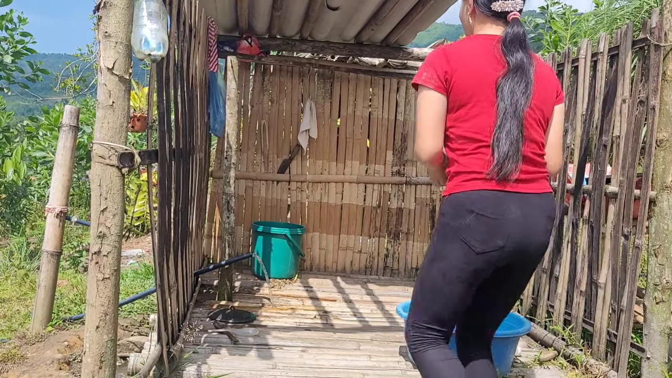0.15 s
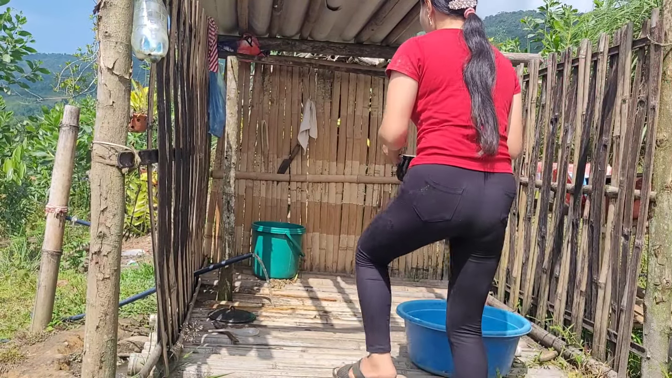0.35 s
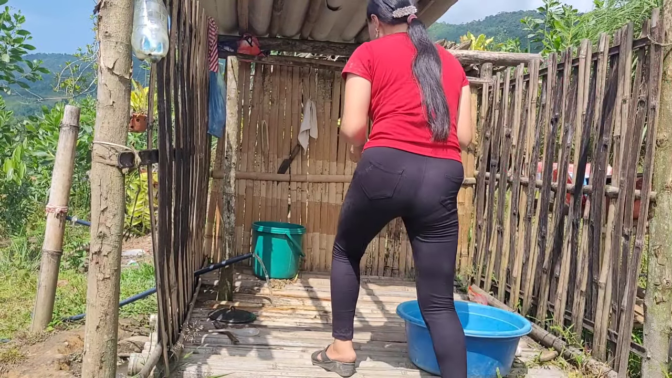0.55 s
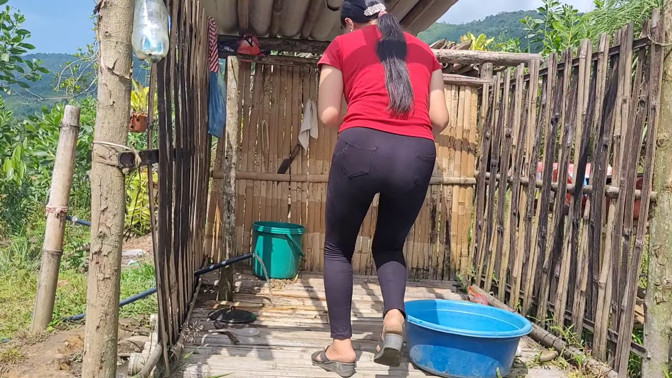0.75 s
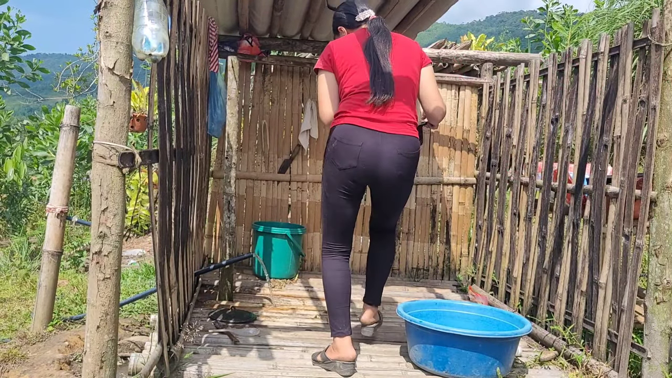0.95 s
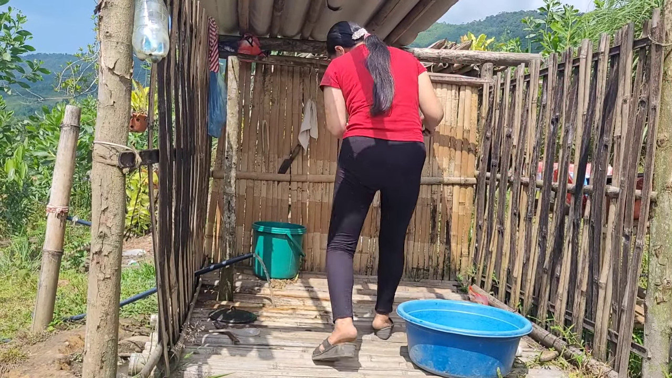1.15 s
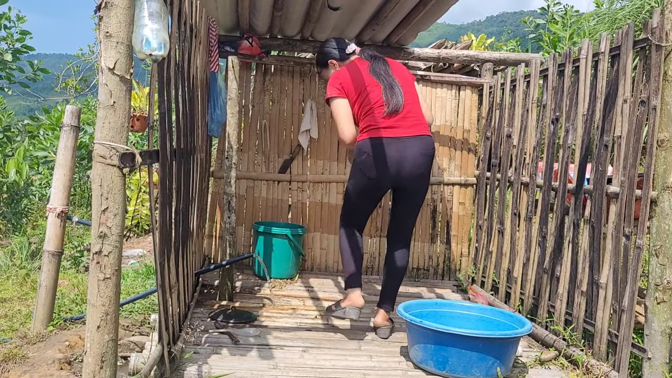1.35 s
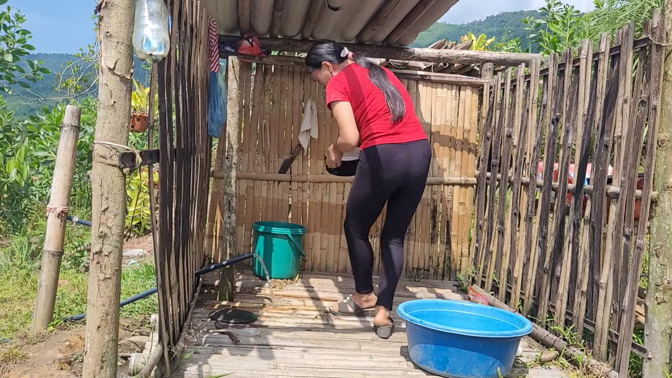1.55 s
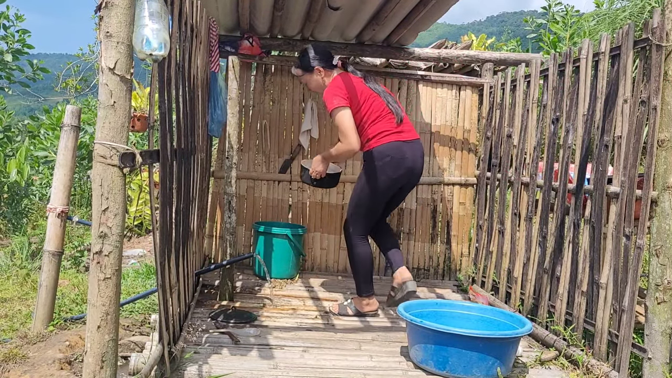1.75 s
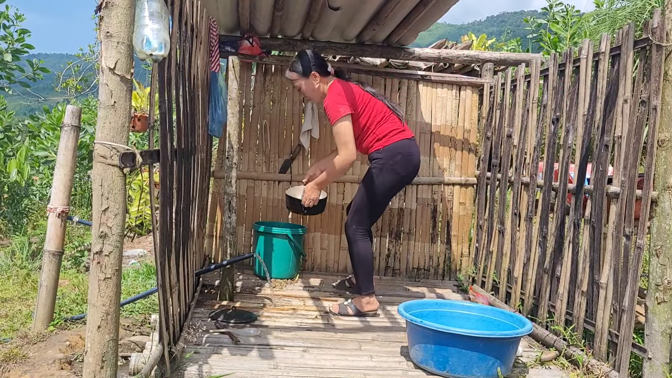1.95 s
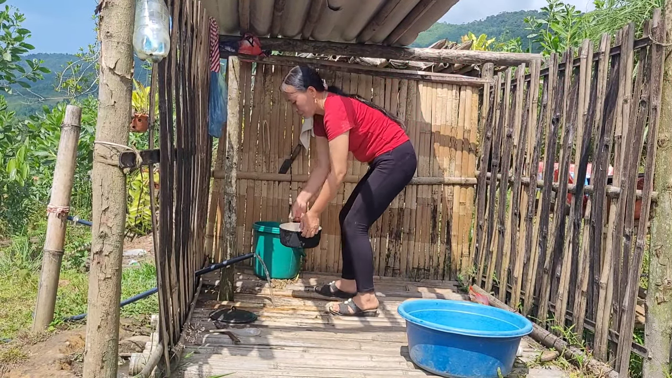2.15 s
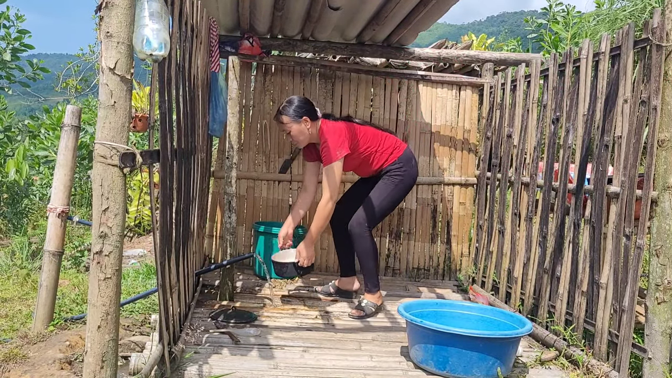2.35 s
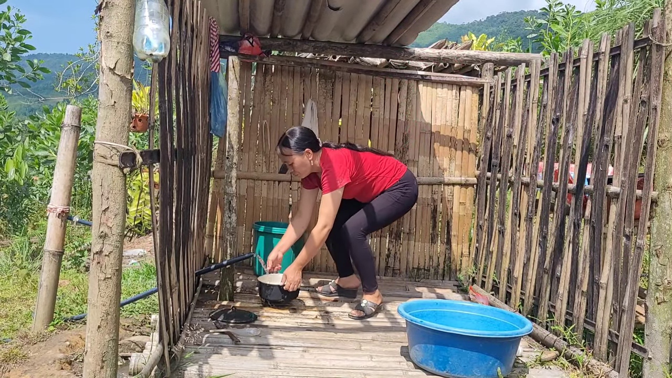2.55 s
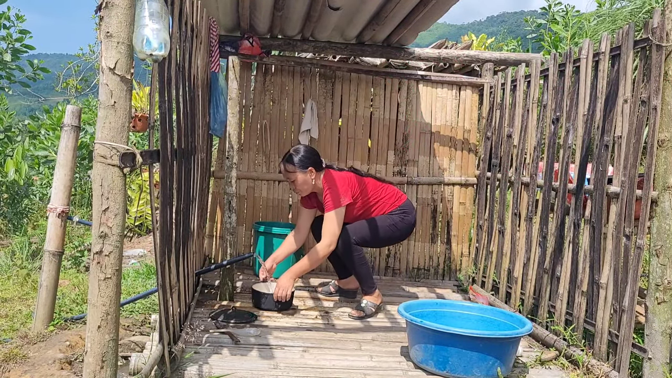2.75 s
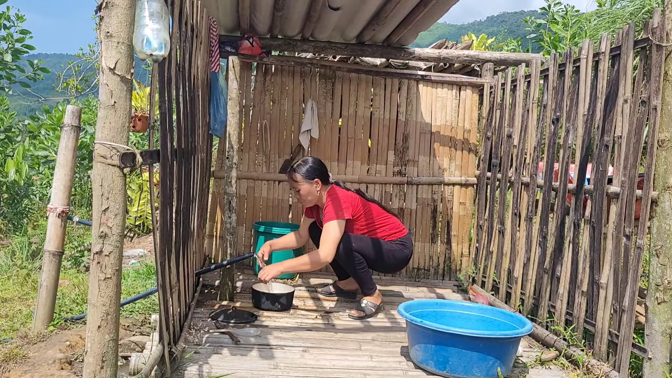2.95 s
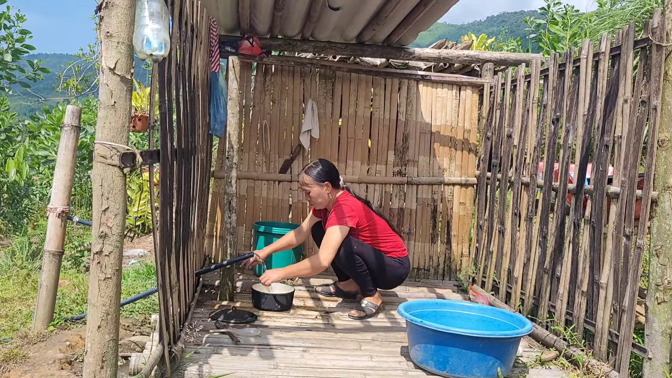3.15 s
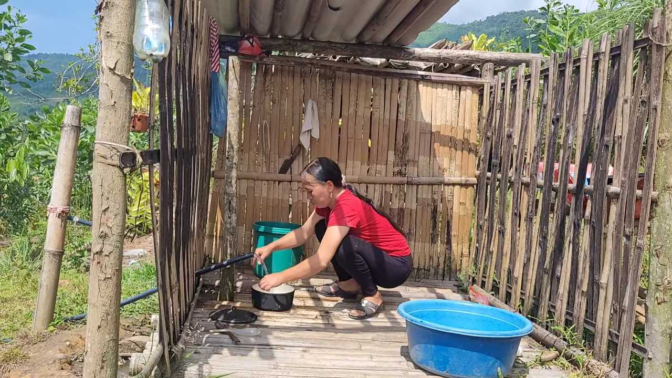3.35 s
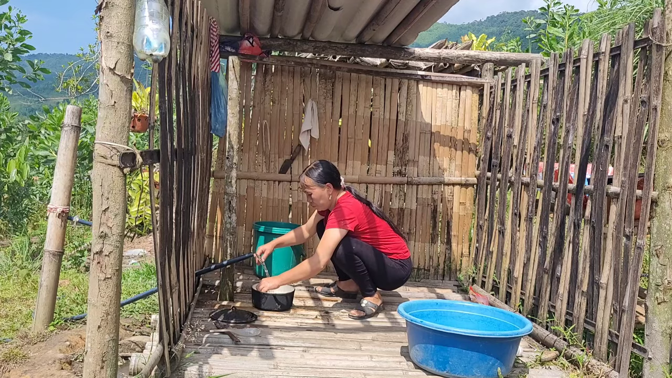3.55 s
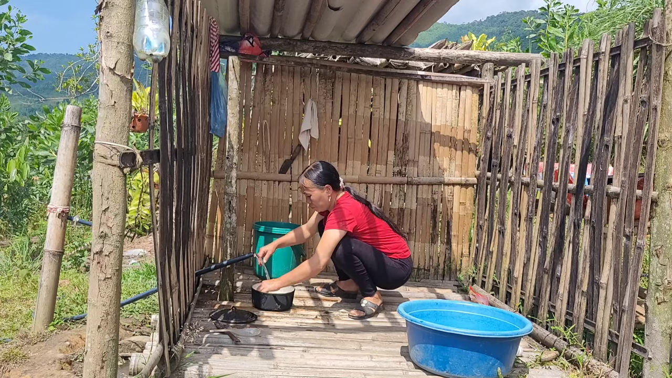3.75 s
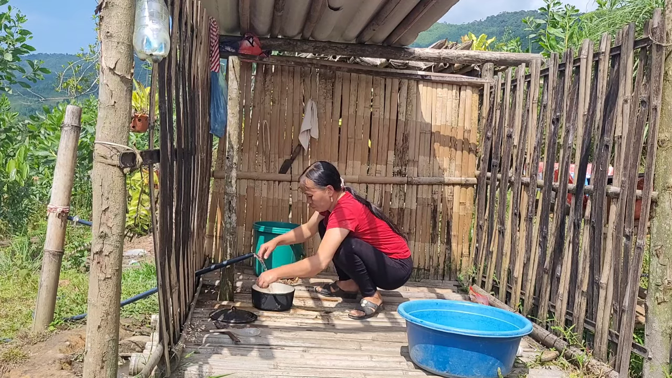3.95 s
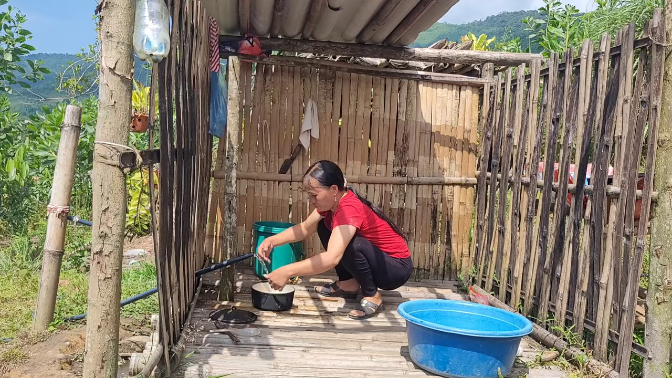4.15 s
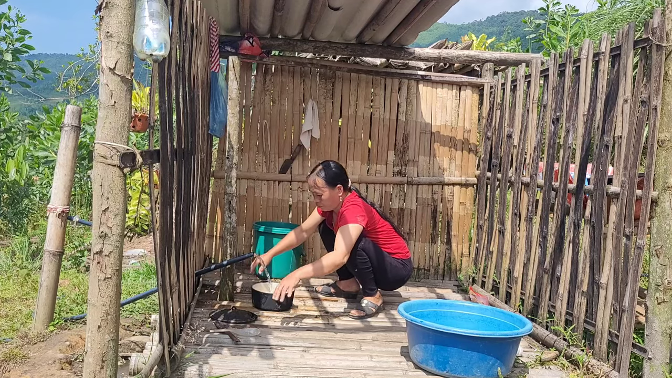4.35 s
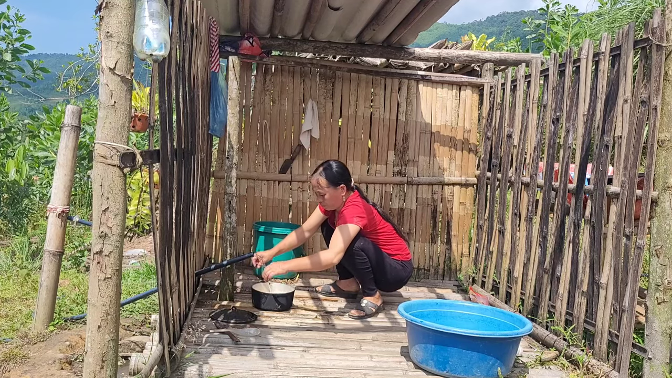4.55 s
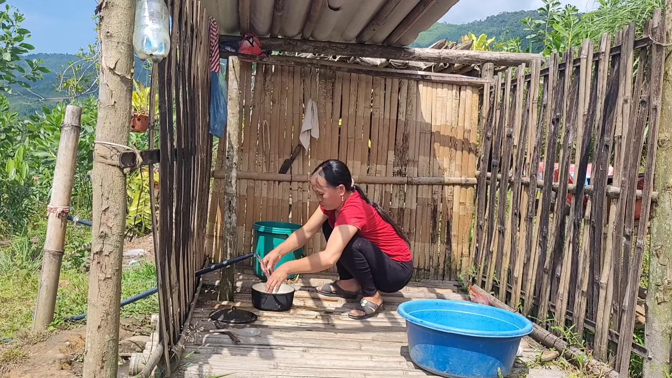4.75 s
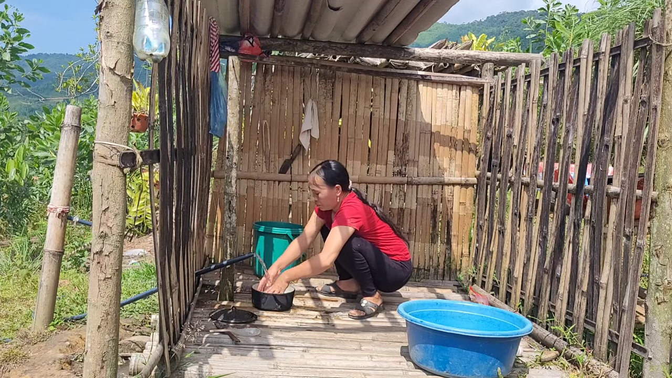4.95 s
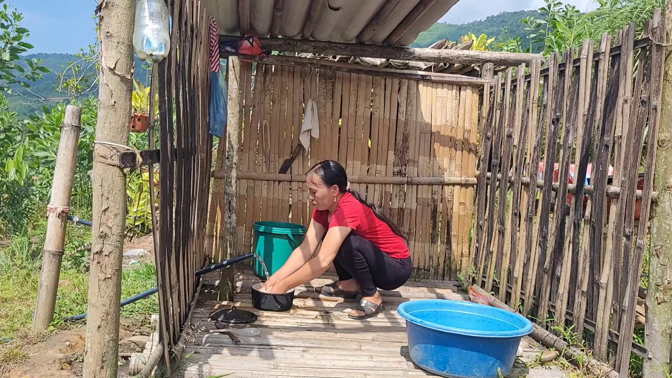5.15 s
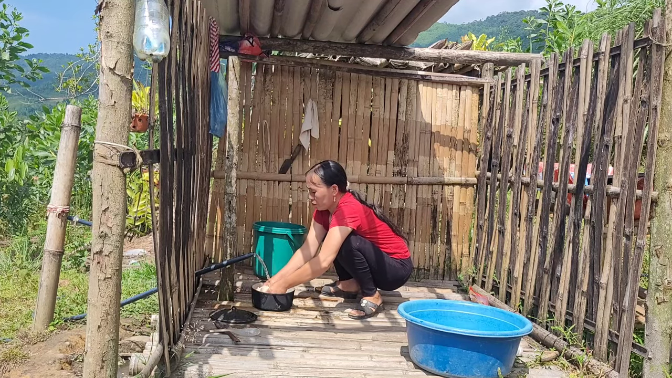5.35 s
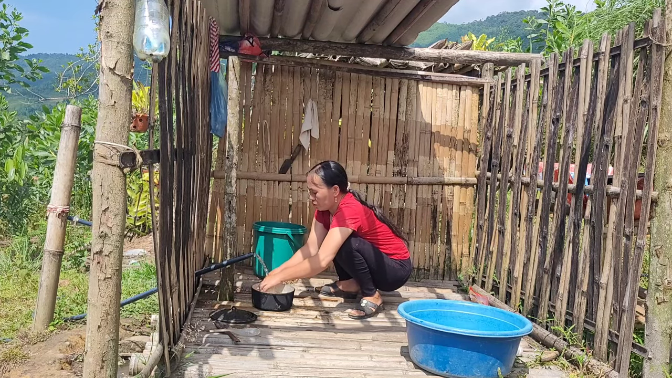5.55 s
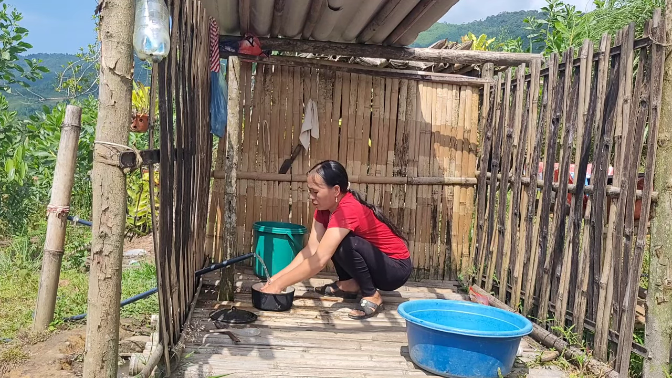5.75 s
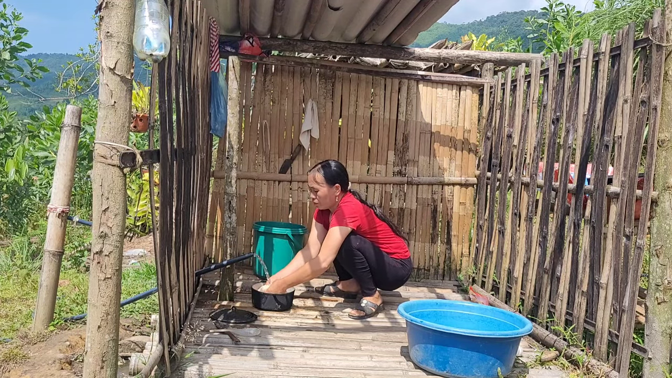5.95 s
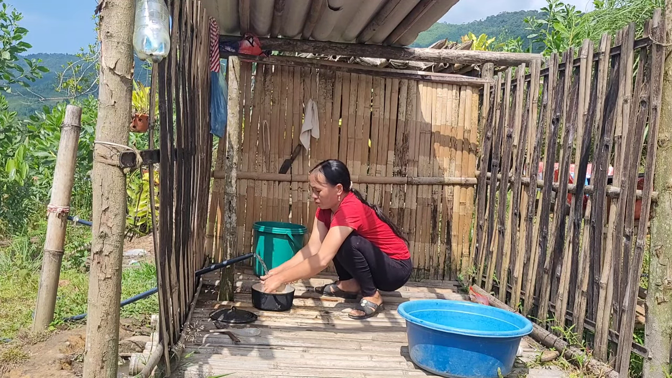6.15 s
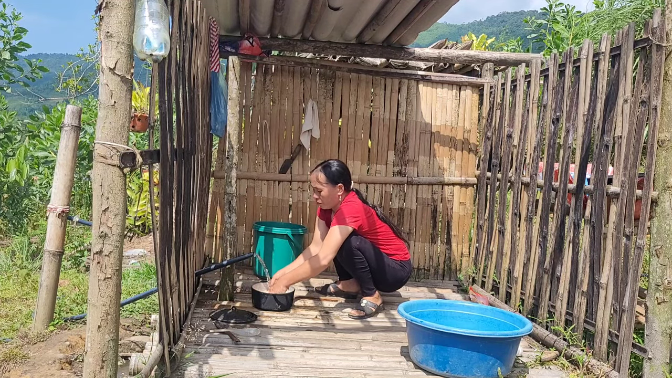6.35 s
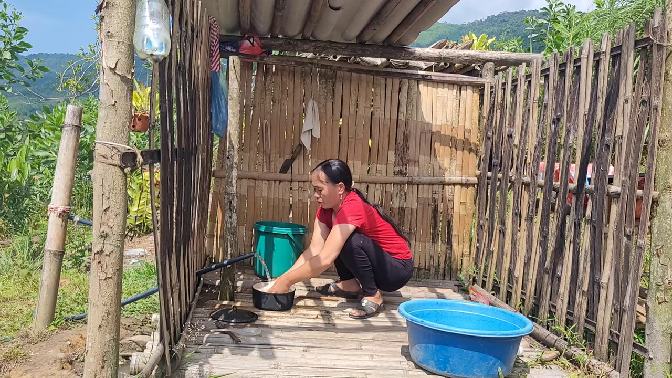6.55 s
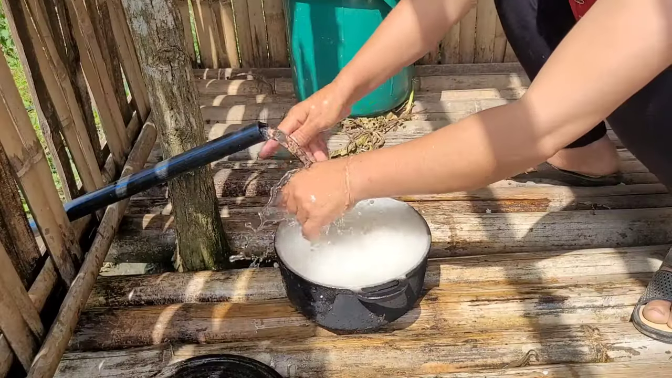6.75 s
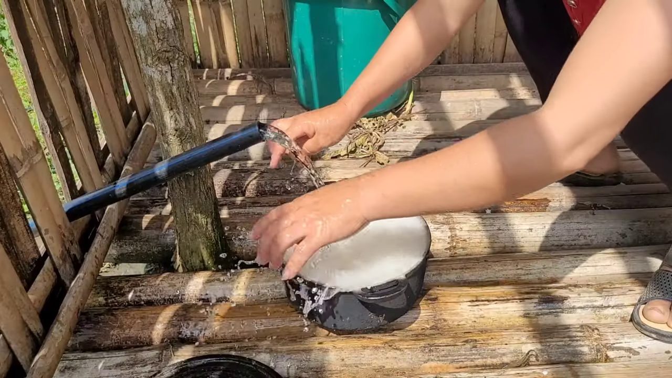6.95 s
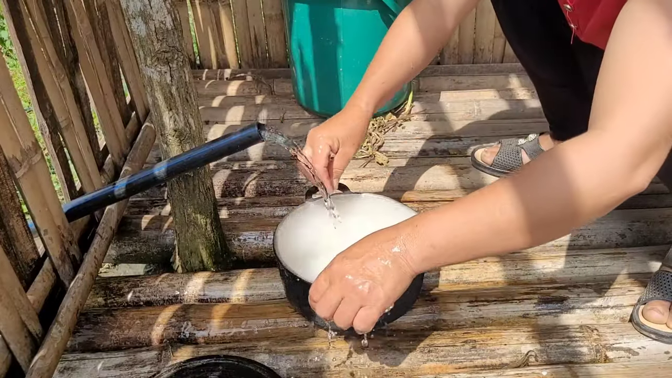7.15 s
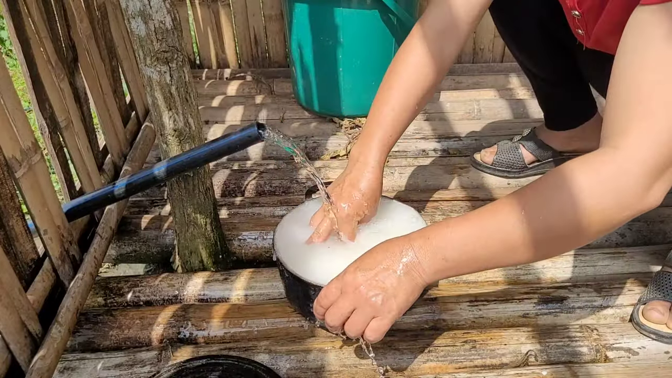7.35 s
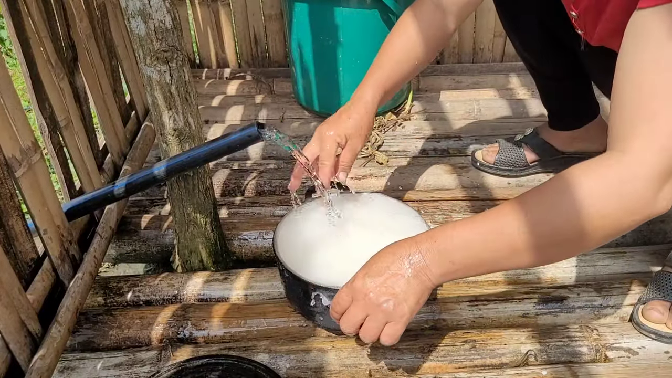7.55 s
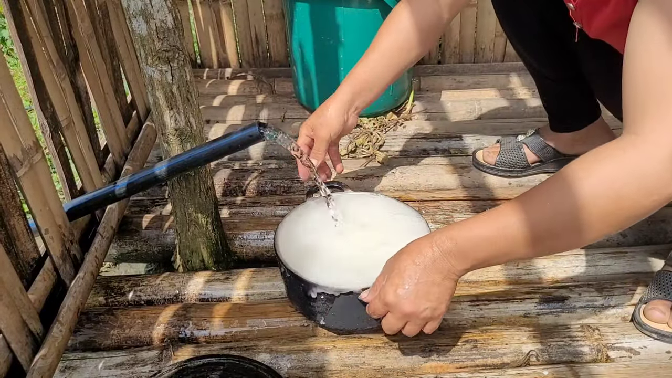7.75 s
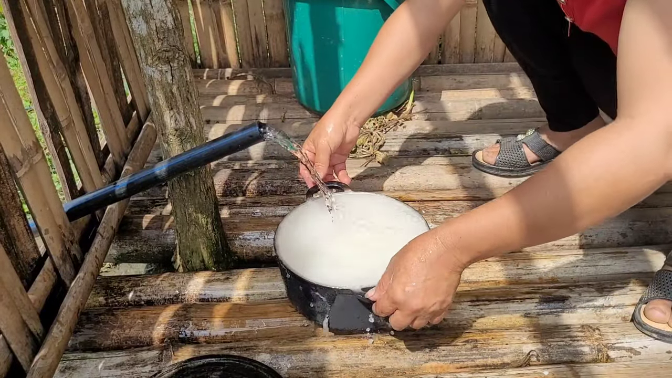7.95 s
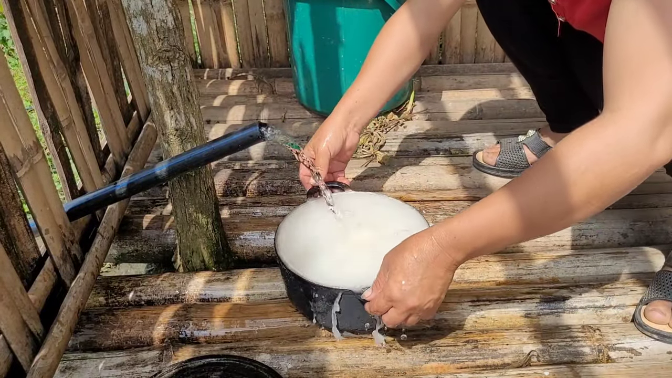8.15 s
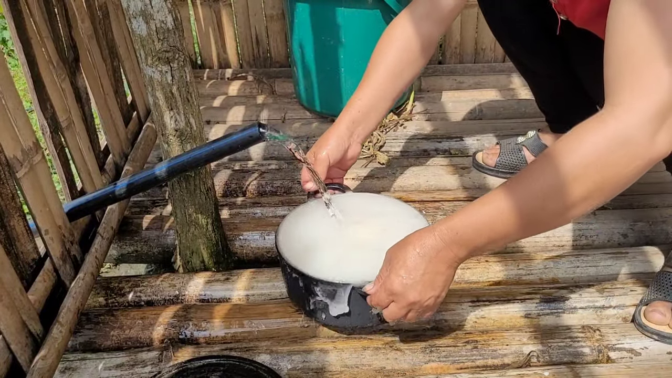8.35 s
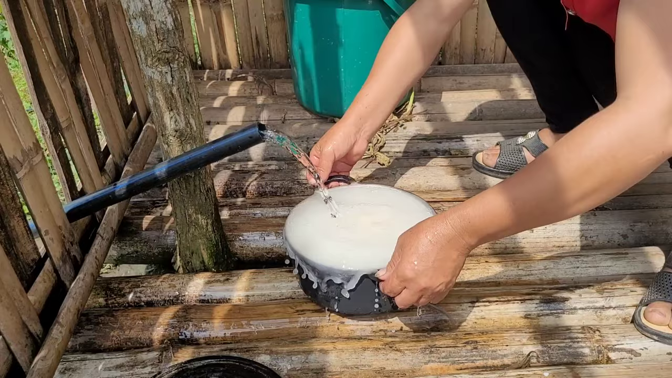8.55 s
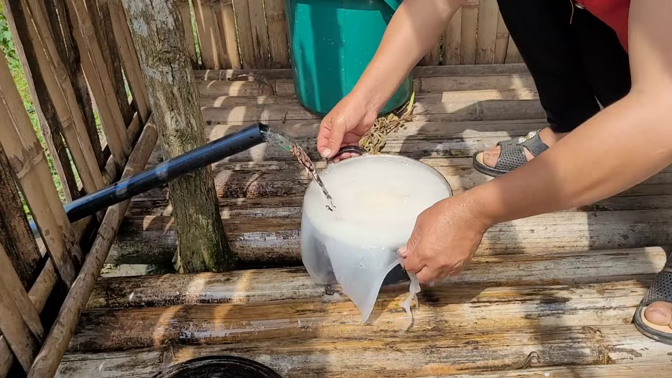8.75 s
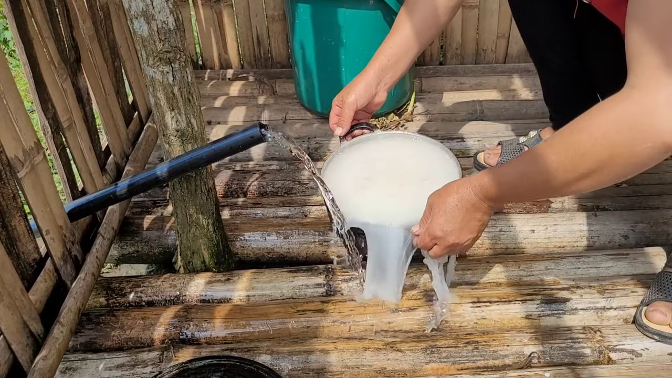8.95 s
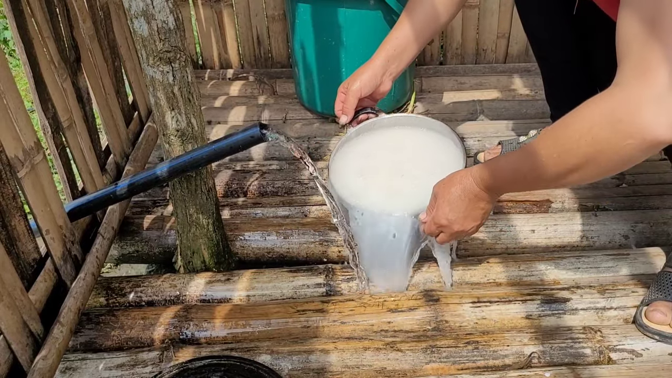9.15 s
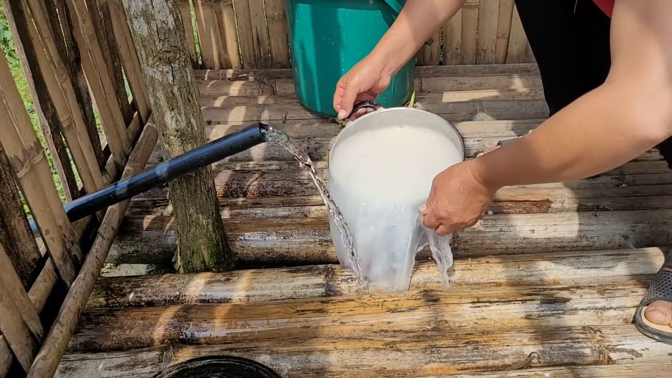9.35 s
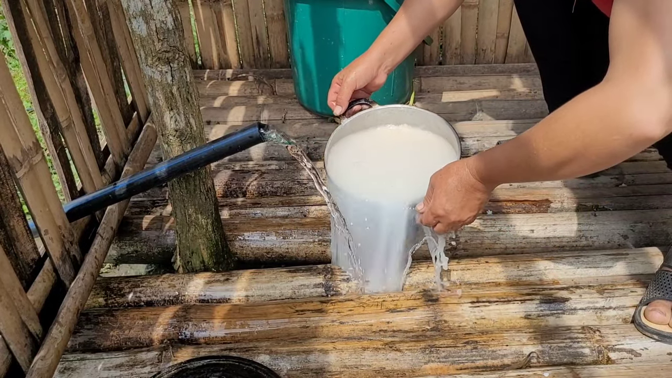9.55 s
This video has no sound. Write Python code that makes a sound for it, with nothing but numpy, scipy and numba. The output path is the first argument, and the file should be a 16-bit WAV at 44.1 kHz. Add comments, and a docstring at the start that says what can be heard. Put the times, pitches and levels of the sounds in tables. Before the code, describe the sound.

In an open bamboo stall, a thin hose stream patters steadily on bare slats, heard from the doorway over faint airy hiss. Hollow sandal steps knock at about 0.5, 1.2, 1.6, 2.0 and 2.4 seconds, the first fairly sharp. Low wind thumps the microphone, strongest from 1.6 to 4. At 2.75 the pot lands with a loud, woody clattering knock, and the patter dies by 3. Water now trickles softly into the pot, with a faint sliding whistle near 3.5 and small plops around 4. From 5 to 6.7 stirring swishes and bubbles in two rounds. At 6.75 the sound jumps close and louder, with little wind: water splashes over hands, bright slaps and quick plops until 7.7. The brimming pot then gurgles and drips with crisp plinks and light taps. From 9 a spill swells into a dense, drumming rush on the slats, cut off near 9.6.

```python
"""Water from a hose patters on a bamboo floor; someone walks in, sets down a pot of rice and rinses it.
The stream is a cloud of droplet clicks and ringing bubbles, heard first from the doorway, then from close by,
where hands splash and the tilted pot spills onto the hollow slats. Knocks excite the damped modes of the slats.
Low-frequency noise is the breeze buffeting the microphone ports, over a faint hiss of distant air."""
import sys
import numpy as np
from scipy import signal
from scipy.fft import rfft, irfft
from scipy.io import wavfile
from scipy.ndimage import uniform_filter1d, map_coordinates
from numba import njit

SR = 44100
rng = np.random.default_rng(int(sys.argv[2]) if len(sys.argv) > 2 else 0)


def master_out(mix):
    """Clip the mix to full scale and print it as 16-bit PCM to the path in sys.argv[1]."""
    frames = np.transpose(np.atleast_2d(mix))
    ceiling = np.clip(frames, -1, 1)
    pcm = np.round(ceiling * 32767).astype(np.int16)
    wavfile.write(sys.argv[1], SR, pcm)


N = 423801
TIME = np.arange(N) / SR  # [s]

# Response of the slats to light drumming: (frequency [Hz], gain [dB])
LIGHT_DRUM = [(150, -16), (270, -15), (385, 6), (500, -15.5), (620, -1), (800, -10), (1500, -60)]


def stream(table, tone, drum_tone=None, click_rate=3000, bubble_rate=300, thud_rate=320, fizz_db=0.2,
           scatter_db=6, spray_db=0, bubble_db=0, drum_db=0, surge_db=1, surge_hz=16, lowest_hz=600,
           cycles=23, rocking=.08, close=False):
    """Superposed impacts: droplets crackle, bubbles resonate and thuds drum; rates per second, dB trims the table."""
    treble, middle, bass = (3000, 15000), (700, 2500), (220, 600)  # levelling bands [Hz]
    wet_db, spread = (-2, 5) if close else (1, 1.5)  # scatter [dB], lag between microphones [samples]
    span = (TIME > table[0][0] - .004) & (TIME < table[-1][0] + .004)
    n = int(span.sum())
    # each column surges on its own
    gain = [(g * undb(surge_db * wander(surge_hz)))[span] for g in gains(table)]

    clicks = steady(cloud(n, click_rate, 2200, 16000, 3, scatter_db, spread, 0), treble)
    fizz = steady(cloud(n, click_rate / 6, 1900, 9000, 24, scatter_db, spread, .2), treble)
    # small drops make no long waves, so the middle range belongs to the bubbles
    high_pass = signal.butter(2, 1700, "high", fs=SR, output="sos")
    drops = signal.sosfilt(high_pass, clicks + undb(fizz_db) * fizz)
    spray = steady(sway(colour(stall(drops, wet_db), tone), .05), treble)
    spray *= undb(np.array([[.7], [-.7]]))  # a little stronger on the left

    bubbles = cloud(n, bubble_rate, lowest_hz, 3000, cycles, 5.5, spread, .25)
    bubbles = steady(sway(colour(stall(bubbles, wet_db), tone), rocking), middle, size=3000)
    sound = undb(spray_db) * gain[0] * spray + undb(bubble_db) * gain[1] * bubbles
    if drum_tone is not None:
        thuds = stall(cloud(n, thud_rate, 200.6, 707, 8.7, 6.3, 8.9, 0.066), -0.81)
        drumming = steady(sway(colour(thuds, drum_tone), rocking), bass, size=3000)
        sound += undb(drum_db) * gain[-1] * drumming
    out = np.zeros((2, N))
    out[:, span] = sound
    return out


def floor_stream():
    """Impact noise on bare slats, from the doorway; it dies away as the pot slides under."""
    # Common course before the trims: (time [s], level [dB])
    course = [(0.0, -58), (0.7, -58.5), (1.4, -56.5), (2.25, -56), (2.68, -59.5), (2.87, -64), (3.08, -90)]
    # Colour of the water, then of its drumming: (frequency [Hz], gain [dB])
    tone = [(250, -39), (450, 4), (680, -9.5), (1000, -3.5), (1550, -7), (2050, -0.5), (2550, -7.5),
            (3000, -2.5), (5000, -0.5), (8800, -7.5), (11500, -0.5), (15500, -6)]
    drum = [(200, -18), (345, -3.5), (470, -24.5), (800, -52), (1500, -41)]
    return stream(one_level(course), tone, drum, click_rate=7800, bubble_rate=2200, cycles=11.3,
                  rocking=.025, scatter_db=3.0, spray_db=-3.0, bubble_db=-5.0, drum_db=-8.0, surge_db=1.0)


def pot_stream():
    """Bubble resonance coloured by the filling pot, from the doorway."""
    # Course before the trims: (time [s], spray level [dB], bubbling level [dB])
    course = [(2.86, -70.5, -61.5), (3.55, -68, -66), (3.95, -67, -66.5), (4.45, -64, -68),
              (4.8, -70, -75.5), (5.03, -70, -74)]
    # Colour of the water in the pot: (frequency [Hz], gain [dB])
    tone = [(300, -33), (520, -3.5), (780, 6), (950, -8.5), (1150, 9.5), (1550, -16), (2000, -6.5),
            (2400, -39), (3050, -7.5), (3500, -23.5), (4700, -7.5), (8800, -20.5), (11500, -10),
            (15500, -23)]
    return stream(course, tone, click_rate=3000, bubble_rate=280, scatter_db=9, spray_db=-3,
                  bubble_db=-4.5, surge_db=2.0, lowest_hz=521, cycles=18, rocking=.12)


def stirring():
    """Agitated water entrains ringing bubbles as the rice is stirred in two rounds."""
    # Common course before the trims: (time [s], level [dB])
    course = [(5.03, -63.5), (5.5, -60.5), (5.85, -57.5), (6.0, -66.5), (6.1, -58), (6.3, -55), (6.62, -63),
              (6.74, -59.5)]
    # Colour of the stirred water: (frequency [Hz], gain [dB])
    tone = [(300, -8), (550, -24), (850, -8.5), (1150, 3), (1600, -6.5), (2000, -2.5), (2400, -9),
            (3100, -5.5), (4800, -3), (8800, -9), (11500, -0.5), (15500, -9.5)]
    return stream(one_level(course), tone, click_rate=4200, bubble_rate=460, scatter_db=2.0,
                  spray_db=-2.5, bubble_db=-6.0, surge_db=1.5, cycles=26)


def hands_stream():
    """Impact and bubble noise close by, as the stream runs over the hands and drums on the slats."""
    # Course before the trims: (time [s], spray level [dB], bubbling level [dB], drumming level [dB])
    course = [(6.74, -49, -58, -83), (6.95, -42, -42, -77), (7.03, -43.5, -39, -59),
              (7.08, -46, -44.5, -49), (7.24, -51.5, -46.5, -53), (7.38, -45, -44, -61),
              (7.48, -42.5, -43.5, -52), (7.65, -43.5, -42, -56), (7.7, -59, -52, -78)]
    # Colour of the water over the hands: (frequency [Hz], gain [dB])
    tone = [(250, -39), (600, -9), (820, -23.5), (1130, 4), (1500, -6), (2000, 0.5), (2400, -8.5),
            (2900, -7), (4500, -5.5), (8800, -15.5), (11500, -7), (15500, -9.5)]
    return stream(course, tone, LIGHT_DRUM, click_rate=2400, bubble_rate=800, fizz_db=0.5, cycles=19.5,
                  rocking=.08, scatter_db=3.5, spray_db=-4.5, bubble_db=-6, drum_db=-2.5, surge_db=1,
                  close=True)


def brimming_stream():
    """Bubble resonance in the brimming pot, close by; the overflow excites the slats."""
    # Course before the trims: (time [s], spray level [dB], bubbling level [dB], drumming level [dB])
    course = [(7.7, -56.5, -48, -54.5), (7.95, -51, -46.5, -55), (8.12, -52, -52, -73.5),
              (8.4, -54.5, -44.5, -69), (8.73, -50.5, -51, -68.5), (8.9, -48.5, -48, -56),
              (8.99, -54, -61, -60)]
    # Colour of the water at the brim: (frequency [Hz], gain [dB])
    tone = [(250, -12), (550, -7.5), (780, -16), (1200, 3.5), (1550, -6.5), (2000, -3), (2500, -11.5),
            (3600, -7), (4300, -7.5), (5800, -9), (8800, -16.5), (11500, -9), (15500, -15)]
    return stream(course, tone, LIGHT_DRUM, click_rate=3300, bubble_rate=900, scatter_db=2.0,
                  spray_db=-2.5, bubble_db=-7.5, drum_db=-5, surge_db=0.1, lowest_hz=487, cycles=24,
                  rocking=0.11, close=True)


def spill():
    """Dense superposition of impacts: a sheet of drops falls from the tilted pot onto the slats."""
    # Colour of the sheet, then of its heavy drumming: (frequency [Hz], gain [dB])
    tone = [(250, -27), (500, -19), (750, -1), (900, -11), (1200, 4.5), (1600, -6.5), (2000, -6.5),
            (3000, -5), (4500, -7), (8800, -15), (12000, -8.5), (15500, -11.5)]
    drum = [(100, -24), (200, -12.5), (290, -3), (400, -9), (500, -21.5), (800, -2), (1500, -33)]
    return stream(tipping(), tone, drum, click_rate=13500, bubble_rate=1600, thud_rate=450, fizz_db=-1,
                  cycles=16, rocking=.1, scatter_db=5, spray_db=-4, bubble_db=-3.5, drum_db=1.5,
                  surge_db=0.26, close=True)


def tipping(start_s=8.99, end_s=9.61):
    """Growing flow: spray rises fastest, then bubbling, then drumming, each easing toward its full level."""
    # Rows spray, bubbling, drumming, before the trims: (first level [dB], full level [dB], rise time [s])
    swell = [(-48, -35, 0.28), (-58.5, -38, 0.39), (-73.5, -44, 0.93)]
    s = np.linspace(start_s, end_s, 64)
    columns = [s]
    for first, full, rise in swell:
        remaining = np.maximum(1 - (s - start_s) / rise, 0) ** 2
        columns.append(full + (first - full) * remaining)
    return np.column_stack(columns)


def sloshes(cycles=20, scatter_db=3, bubbles_per_s=150, min_count=10):
    """Air entrainment: a hand stroke or surge folds air under; the run of bubbles drifts in pitch."""
    # Runs: (time [s], length [s], level before scattering [dB], first pitch [Hz], last pitch [Hz],
    # pitch scatter [natural-log units])
    runs = [(2.192, 0.025, -52.5, 734, 1180, 0.05), (3.293, 0.032, -64, 1150, 1250, 0),
            (4.148, 0.49, -73.5, 2880, 3120, 0), (5.037, 0.088, -69, 700, 940, 0.05),
            (5.198, 0.021, -63, 1310, 1650, 0), (5.831, 0.071, -64.5, 1750, 2200, 0.06),
            (6.067, 0.073, -64, 1290, 2200, 0.24), (6.743, 0.049, -60, 1610, 2310, 0),
            (7.004, 0.076, -49.5, 800, 1490, 0.31), (7.128, 0.12, -53, 522, 1240, 0.42),
            (7.309, 0.026, -47.5, 730, 1510, 0.02), (7.358, 0.033, -39.5, 3080, 2360, 0.11),
            (7.43, 0.051, -45, 2400, 3030, 0.16), (7.502, 0.058, -40, 2440, 3130, 0.21),
            (7.649, 0.021, -37.5, 3130, 3370, 0.23), (7.717, 0.021, -46.5, 2070, 2300, 0.07),
            (7.801, 0.056, -56, 440, 920, 0.02), (8.174, 0.023, -40.5, 6100, 4550, 0.12),
            (8.294, 0.024, -49, 2870, 2560, 0), (8.437, 0.033, -51.5, 1410, 1700, 0),
            (8.626, 0.067, -55.5, 2680, 2320, 0.06), (8.699, 0.017, -46, 3970, 3900, 0.03),
            (8.94, 0.024, -46, 2400, 2540, 0), (8.999, 0.024, -39, 4470, 4120, 0.05),
            (9.217, 0.05, -47.5, 1370, 500, 0.35), (9.438, 0.057, -47.5, 645, 265, 0.21)]
    out = np.zeros((2, N))
    for s, length, db, first_hz, last_hz, pitch_spread in runs:
        count = max(min_count, int(bubbles_per_s * length))
        progress = (np.arange(count) + rng.random(count)) / count
        pitch, weight, place = rng.standard_normal((count, 3)).T
        hz = first_hz * (last_hz / first_hz) ** progress * np.exp(pitch_spread * pitch)
        size = undb(scatter_db * weight)
        run = ring(progress * length * SR, hz, np.full(count, float(cycles)), size, 4 * place, 0.52, SR // 3)
        add(out, s, undb(db) * run / np.sqrt(np.sum(run ** 2) / (2 * length * SR)))
    return stall(out, -1.5)


def plops(attack_s=0.00067, wobble_hz=90):
    """Bubble resonance: a pinched-off air pocket slides up near the surface, or down as it is pushed under."""
    # Bubbles: (time [s], amplitude before attack and decay [dB], pitch [Hz], slide [Hz/s], t60 [s])
    bubbles = [(3.87, -46, 715, 1500, 0.14), (4.13, -49, 750, 2500, 0.086), (5.027, -55, 1055, -500, 0.08),
               (5.826, -50.5, 1140, 2000, .05), (6.101, -51.5, 1127, 1900, .06),
               (6.153, -48.5, 1520, -3000, 0.046), (6.228, -47.5, 1180, 500, 0.059),
               (6.313, -50, 1184, -3000, 0.045), (6.44, -51, 1110, -2200, .09),
               (6.516, -46, 614, 3000, 0.03), (6.588, -47, 1190, -4000, 0.039),
               (6.606, -47.5, 905, -1200, 0.049), (6.823, -40.5, 1096, -1500, 0.11),
               (6.84, -53, 720, -1500, 0.24), (6.852, -39, 1280, 3000, 0.14),
               (6.907, -39, 1055, 3898, 0.074), (6.912, -37, 1350, -1800, 0.085),
               (6.967, -35, 1420, -1900, .06), (7.007, -39.5, 515, 3000, 0.083),
               (7.013, -41, 1124, -2200, .1), (7.023, -41, 865, 4500, 0.066),
               (7.032, -34, 1670, -1200, 0.05), (7.048, -36, 1110, -1500, 0.093),
               (7.067, -33, 1660, 600, 0.041), (7.148, -47, 1100, 802, .15), (7.166, -41, 1890, 1600, 0.11),
               (7.169, -33, 616, 2500, 0.046), (7.199, -41, 626, 1200, 0.048),
               (7.367, -37, 1092, 700, 0.18), (7.373, -30.5, 1920, 3000, 0.054),
               (7.713, -27.5, 1970, 7002, 0.04), (7.861, -38.5, 1237, -800, 0.073),
               (8.023, -46.5, 1087, 1000, 0.11), (8.143, -33.5, 4240, 9000, .03),
               (8.175, -20, 5600, -9000, 0.013), (8.189, -28, 4340, 0, 0.016), (8.24, -42, 1020, 0, .04),
               (8.309, -38, 1860, 5000, 0.04), (8.452, -40, 1220, 3500, 0.053),
               (8.511, -37, 1186, -4500, 0.07), (8.566, -37.5, 1280, 800, 0.062),
               (8.571, -31.5, 3940, 0, 0.024), (8.661, -45, 2010, 500, 0.1),
               (8.818, -40, 1260, -2500, 0.067), (8.841, -35.5, 1072, -2000, 0.13),
               (8.902, -33.5, 1140, -3000, 0.058), (8.901, -36, 2076, -6500, 0.076),
               (9.01, -36.5, 1290, -4000, 0.053), (9.132, -35.5, 1095, 3900, 0.064)]
    out, t = np.zeros((2, N)), np.arange(SR // 4) / SR
    for s, db, hz, slide, t60 in bubbles:
        wobble = .035 * wander(wobble_hz, len(t))
        phase = 2 * np.pi * np.cumsum(hz * (1 + wobble) + slide * t) / SR
        tone = np.sin(phase) * fade(t, t60) * (1 - np.exp(-t / attack_s))
        add(out, s, undb(db) * np.array([tone, tone]))
    return stall(out, -3.0)


def splats(body_t60=0.052, splash_t60=0.11, spray_t60=0.15, grain_db=3, smack_t60=0.0084, hump_db=7.5):
    """Impact then break-up: a slap of water smacks and bursts into a quickly thinning shower of droplets."""
    # Slaps: (time [s], level before the trim [dB], tilt of the outer bands about it [dB],
    # first smack [multiple of the shower])
    slaps = [(1.29, -53, 3.5, 0), (3.566, -64, 14, 1), (4.341, -64.5, 11, 1), (4.407, -64, 11, 1),
             (5.533, -63, 7, .5), (5.674, -55.5, 6, 0), (6.065, -51, 12.5, 2), (6.226, -58, -7, 1),
             (6.741, -53, -5, .5), (7.183, -50.5, 10, .5), (7.3155, -40, 1, 2), (7.36, -49.5, -3, 1.5),
             (7.657, -46, 6, 0), (7.715, -44.5, 2.5, .5), (7.763, -56, -18.5, 1.5), (7.907, -55, -3, 2),
             (8.1752, -46, 8, 2.5), (8.2932, -52, 2, 2.5), (8.3765, -44.5, 0.5, 5), (8.6107, -49.5, 5, 3),
             (8.716, -44, 2, 0), (8.946, -47, 2, 0), (9.0022, -41, 4.5, 1)]
    trim_db = -5.0
    out, t = np.zeros((2, N)), np.arange(SR // 6) / SR
    bands = [(600, 2500), (2500, 6600), (6600, 15500)]  # [Hz]
    t60s, widths = (body_t60, splash_t60, spray_t60), (.5, .8, 1)
    for s, level_db, bright_db, smack in slaps:
        levels = level_db + np.array([-bright_db, hump_db, bright_db])
        # grain holds each random level for 24 samples
        grain = undb(grain_db * np.repeat(rng.standard_normal(len(t)), 24)[:len(t)])
        for db, band, t60, width in zip(levels, bands, t60s, widths):
            envelope = grain * fade(t, t60) + smack * fade(t, smack_t60)
            mid, side = rng.standard_normal((2, len(t))) * envelope
            band_pass = signal.butter(3, band, "band", fs=SR, output="sos")
            burst = signal.sosfilt(band_pass, [mid + width * side, mid - width * side])
            add(out, s, undb(db + trim_db) * burst / burst[:, :SR // 80].std())
    return out


def whistle(half_width_hz=130, overtone=2.0, overtone_db=-4):
    """Narrow-band resonance: the spray excites two tones that slide down as the hose is moved."""
    # Course of the lower tone: (time [s], pitch [Hz], level before scattering [dB])
    course = [(3.3, 4800, -75), (3.4, 4860, -85), (3.5, 4810, -79), (3.57, 4030, -79), (3.64, 3140, -69),
              (3.7, 2730, -76), (3.76, 2600, -86)]
    s, hz, db = np.transpose(course)
    phase = 2 * np.pi * np.cumsum(np.interp(TIME, s, hz)) / SR
    low_pass = signal.butter(2, half_width_hz, fs=SR, output="sos")
    grain = signal.sosfilt(low_pass, rng.standard_normal((4, N)))
    # slow complex noise gives each tone its width
    low, high = (grain[:2] + 1j * grain[2:]) / grain.std()
    upper = undb(overtone_db) * high * np.exp(1j * overtone * phase)
    tone = np.real(low * np.exp(1j * phase) + upper)
    return stall(np.array([tone, tone]) * np.interp(TIME, s, undb(db), left=0, right=0), -1)


def knocks(crack_t60=0.095, crack_db=-3, spot_db=7.5, spot_width=0.12):
    """Modal excitation: sandals and the pot ring the slats; each spot favours modes near its own pitch."""
    # Blows: (time [s], level before scattering [dB], brightness of contact [Hz], gain at 220 Hz [dB],
    # gain an octave above the brightness [dB], ring time [multiple of the slats' own],
    # favoured pitch [Hz], contact time [s])
    blows = [(0.508, -44.5, 450, -1, -14, 0.54, 307, 0.0018),
             (0.539, -28.5, 1820, -5.5, -5, 0.43, 450, 0.00076),
             (0.554, -36, 1200, 5, -3, .5, 830, 0.00091), (1.18, -38, 1780, 1.5, -15, .9, 395, 0.00061),
             (1.243, -45, 750, -10, -3, 0.64, 590, 0.0025), (1.611, -46, 1490, -9, 8, 1.4, 1060, 0.0027),
             (1.647, -47, 900, 5, 6, 0.6, 275, .006), (2.048, -42.5, 400, 28, -12, 0.79, 142, .001),
             (2.136, -50, 905, 6, 3, 1.6, 480, .002), (2.398, -38.5, 450, 5.5, -9, 0.29, 343, 0.00088),
             (2.7428, -23.5, 1400, 1, -5, 1.01, 370, 0.00082),
             (2.7697, -23, 3600, 4.5, -10, 0.64, 287, 0.00043),
             (2.785, -25.5, 400, 3, -19, 0.51, 211, 0.0023), (7.713, -43, 3000, -2, -7, 1.1, 380, 0.00078),
             (8.377, -44.5, 2500, 4.5, -2, 0.57, 380, .0007), (8.392, -47.5, 400, 12.5, -7, 1.1, 275, .002)]
    # Modes of the bamboo floor: (frequency [Hz], level [dB], t60 [s])
    slats = [(145, -6.5, 0.11), (206, -5, 0.176), (279, 1, 0.16), (343, 0.5, 0.3), (377, 3, 0.1),
             (473, -5, 0.064), (539, -7.5, 0.11), (573, -2, 0.072), (626, -8.5, 0.17), (860, -2.5, 0.097),
             (1048, -1.5, 0.086), (1244, -3.5, 0.089), (1790, -2.5, 0.079), (2140, -14, 0.041)]
    crack_colour = [(100, -10.5), (350, 4), (590, 15.5), (870, 7.5), (1400, 1.5), (2000, 1),
                    (3300, -5.0), (5200, -2), (8000, -16)]  # (frequency [Hz], gain [dB])
    out, t = np.zeros((2, N)), np.arange(SR // 3) / SR
    mode_hz, mode_db, mode_t60 = np.transpose(slats)
    for s, db, hz, weight_db, fall_db, ringing, spot_hz, contact_s in blows:
        favour = np.exp(-(np.log(mode_hz / spot_hz) / spot_width) ** 2)
        sizes = undb(mode_db + spot_db * favour)
        body = np.zeros(len(t))
        for k in range(len(slats)):
            mode = sizes[k] * fade(t, mode_t60[k] * ringing) * np.sin(2 * np.pi * mode_hz[k] * t)
            body += (-1) ** k * mode  # neighbouring modes swing against each other
        # the slats chatter against their joists
        crack = rng.standard_normal(len(t)) * fade(t, crack_t60 * ringing)
        crack = colour(crack[None], crack_colour)
        blow = body / np.linalg.norm(body) + undb(crack_db) * crack / np.linalg.norm(crack)
        bright_hz = max(hz, 390)
        contact = [(220, weight_db), (380, 0), (bright_hz, 0), (bright_hz * 2, fall_db), (bright_hz * 4, -15)]
        blow = colour(blow * (1 - np.exp(-t / contact_s)), contact)
        add(out, s, undb(db) * np.repeat(blow, 2, 0) / blow[:, :SR // 70].std())
    return stall(out, -6.5, t60=0.18, wide_hz=690)


def wind(brightening=0.26):
    """Turbulence: eddies buffet each port on its own, the left harder; strong gusts shed smaller eddies."""
    # Colour of the eddies: (frequency [Hz], gain [dB])
    tone = [(15, -33), (30, -16), (52, 6.5), (95, -4.5), (140, -11), (200, -23), (300, -29.5), (450, -46),
            (900, -58)]
    gust = wind_strength()
    eddies = colour(rng.standard_normal((2, N)), tone, size=16384) * undb(np.array([[1.7], [-1.7]]))
    eddies = steady(eddies, (20, 170))
    large = signal.sosfiltfilt(signal.butter(2, 110, fs=SR, output="sos"), eddies)
    return gust * (large + (gust / undb(-40.0)) ** brightening * (eddies - large))


def wind_strength(buffet_hz=18, buffet_db=4):
    """Power addition: smooth gust humps join a slow breeze that buffets at random."""
    # Breeze between the gusts, before buffeting: (time [s], level [dB])
    calm = [(0.0, -57.5), (0.75, -67), (1.0, -52), (1.6, -44.5), (1.95, -40.5), (2.55, -52.5), (3.1, -42.5),
            (3.6, -36), (3.98, -51), (4.4, -44), (5.0, -49.5), (5.3, -62), (5.7, -58.5), (6.15, -52),
            (6.7, -51), (6.75, -66), (7.55, -61.5), (7.75, -77.5), (9.0, -78), (9.6, -67)]
    # Gusts that stand out: (time of crest [s], width between 1/e points [s], level at crest [dB])
    crests = [(0.117, 0.054, -43), (1.252, 0.038, -44), (1.69, 0.05, -34), (2.069, 0.075, -34),
              (2.186, 0.045, -35.5), (2.44, 0.046, -41.5), (2.676, 0.092, -31.5), (3.062, 0.072, -36),
              (3.315, 0.043, -37), (3.506, 0.038, -36), (3.647, 0.11, -33.5), (4.267, 0.088, -40),
              (4.408, 0.04, -38.5), (4.794, 0.033, -40), (7.484, 0.088, -49.5)]
    breeze = gains(calm)[0] * undb(buffet_db * wander(buffet_hz))
    humps = [undb(db) * np.exp(-(2 * (TIME - s) / length) ** 2) for s, length, db in crests]
    return np.sqrt(breeze ** 2 + np.sum(np.square(humps), axis=0))


def air(wide_hz=1300):
    """Diffuse field: the smooth hiss of the open hillside, whose long waves reach both microphones alike."""
    # Colour of distant air: (frequency [Hz], gain [dB])
    tone = [(100, -20.5), (220, 2), (462, -11), (715, -9.5), (1150, -17), (1560, -26), (2400, -17),
            (4500, -12), (15500, -18.5)]
    mid, side = rng.standard_normal((2, N))
    side = signal.sosfilt(signal.butter(1, wide_hz, "high", fs=SR, output="sos"), side)
    hiss = colour(np.array([mid + side, mid - side]), tone)
    return undb(-66.5) * hiss / hiss.std()


def cloud(n, rate, lo_hz, hi_hz, cycles, scatter_db, spread, glide):
    """Random arrivals of droplets or bubbles, rate per second; spread scales their lag between microphones."""
    start = np.flatnonzero(rng.random(n) < rate / SR).astype(float)
    pitch, length, weight, place = rng.standard_normal((len(start), 4)).T
    hz = lo_hz * (hi_hz / lo_hz) ** (.5 + .5 * np.tanh(.85 * pitch))
    size = hz * undb(scatter_db * np.minimum(weight, 2))
    return ring(start, hz, cycles * np.exp(0.743 * length), size, spread * place + 1, float(glide), n)


@njit
def ring(start, hz, cycles, size, lag, glide, n):
    """Damped oscillation: decaying sines that rise in pitch, each with its own lag between microphones."""
    out = np.zeros((2, n))
    for k in range(len(start)):
        life = cycles[k] * SR / hz[k]
        for c in range(2):
            onset = start[k] + (c - .5) * lag[k]
            for i in range(max(int(onset) + 1, 0), min(int(onset + life), n)):
                u = (i - onset) / life
                phase = 2 * np.pi * cycles[k] * u * (1 + glide * u / 2)
                out[c, i] += size[k] * np.exp(-6 * u) * np.sin(phase)
    return out


def sway(x, depth, sway_hz=11):
    """Time warping: the rocking water slides all pitches and resonances up and down by a share depth."""
    place = np.cumsum(np.exp(depth * wander(sway_hz)[:x.shape[1]]))
    return np.array([map_coordinates(side, [place], order=3, mode="mirror") for side in x])


def stall(x, wet_db, t60=0.066, wide_hz=1300):
    """Scattering off the bamboo walls; long waves reach both microphones alike."""
    t = np.arange(SR // 4) / SR
    mid, side = rng.standard_normal((2, len(t))) * fade(t, t60) * (t > .002)
    side = signal.sosfilt(signal.butter(1, wide_hz, "high", fs=SR, output="sos"), side)
    echo = np.array([mid + side, mid - side]) / np.sqrt(2 * np.sum(mid ** 2))
    return x + undb(wet_db) * signal.fftconvolve(x, echo, axes=1)[:, :x.shape[1]]


def colour(x, points, size=4096):
    """Minimum-phase (causal) filter through (frequency [Hz], gain [dB]) points."""
    hz, db = np.transpose(points)
    grid_hz = np.linspace(1, SR / 2, size // 2 + 1)
    log_gain = np.log(undb(np.interp(np.log(grid_hz), np.log(hz), db)))
    # folding the cepstrum makes the filter causal
    cepstrum = irfft(log_gain)[:size // 2]
    cepstrum[1:] *= 2
    response = irfft(np.exp(rfft(cepstrum, size)))
    return signal.fftconvolve(x, response[None], axes=1)[:, :x.shape[1]]


def steady(x, band, size=6000):
    """Running power normalisation in a band: slow swells are evened out and the fine grain kept."""
    mid = signal.sosfiltfilt(signal.butter(2, band, "band", fs=SR, output="sos"), x.mean(0))
    power = uniform_filter1d(uniform_filter1d(mid ** 2, size), size // 2)
    return x / np.sqrt(power + 1e-18)


def wander(rate, size=N):
    """Interpolated noise: smooth random motion with a spread near 1, turning rate times a second."""
    turns = rng.standard_normal(1024)
    return map_coordinates(turns, [TIME[:size] * rate], order=3, mode="wrap")


def one_level(table):
    """Common envelope: spray, bubbling and drumming all follow the same level."""
    return [(s, db, db, db) for s, db in table]


def gains(table):
    """Logarithmic interpolation: each dB column of a course becomes a gain per sample."""
    s, *columns = np.transpose(table)
    return [undb(np.interp(TIME, s, c)) for c in columns]


def undb(db):
    """Logarithmic level: decibels to amplitude gain."""
    return 10 ** (np.asarray(db) / 20)


def fade(t, t60):
    """Exponential decay by 60 dB in t60 seconds."""
    return np.exp(-np.log(1000) * t / max(t60, 1e-3))


def add(out, s, sound):
    """Superposition: mix a stereo sound in at time s [s]."""
    i = int(s * SR)
    out[:, i:i + sound.shape[1]] += sound[:, :N - i]


def scene():
    """Superposition of water, footsteps and weather."""
    water = floor_stream() + pot_stream() + stirring() + hands_stream() + brimming_stream() + spill()
    return water + sloshes() + plops() + splats() + whistle() + knocks() + wind() + air()


def record(dry, right_lag=0.92, top_hz=15800):
    """Port response: each side has its own colour, the right lags by some samples, and the top is cut."""
    # Balance of the ports: (frequency [Hz], left over right [dB])
    balance = [(500, 0.5), (1200, -0.5), (2500, 0.5), (5000, 2), (9000, -3), (15000, 1)]
    left = colour(dry[:1], [(hz, db / 2) for hz, db in balance])[0]
    right = colour(dry[1:], [(hz, -db / 2) for hz, db in balance])[0]
    right = map_coordinates(right, [np.arange(N) - right_lag], order=5)
    return signal.sosfilt(signal.ellip(10, .2, 70, top_hz, fs=SR, output="sos"), [left, right])


dry = scene()
out = record(dry)
master_out(out)
```